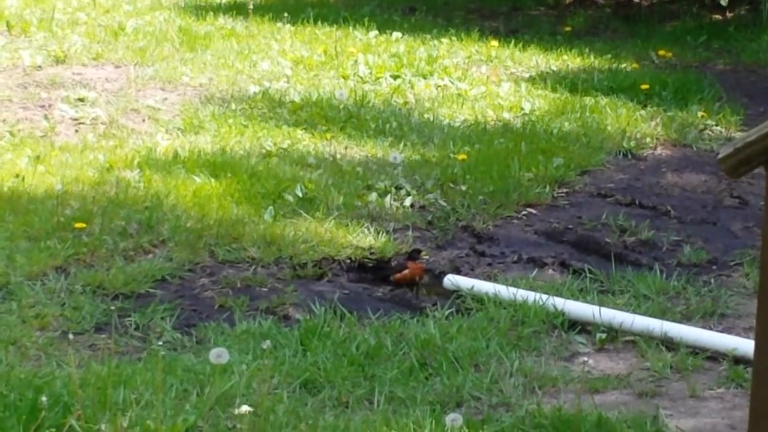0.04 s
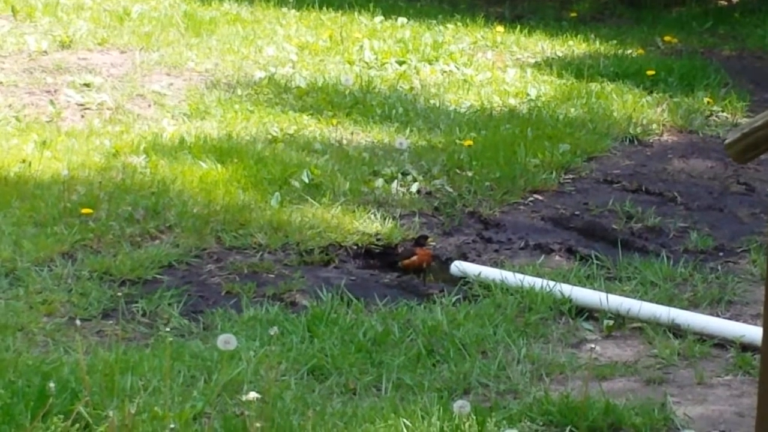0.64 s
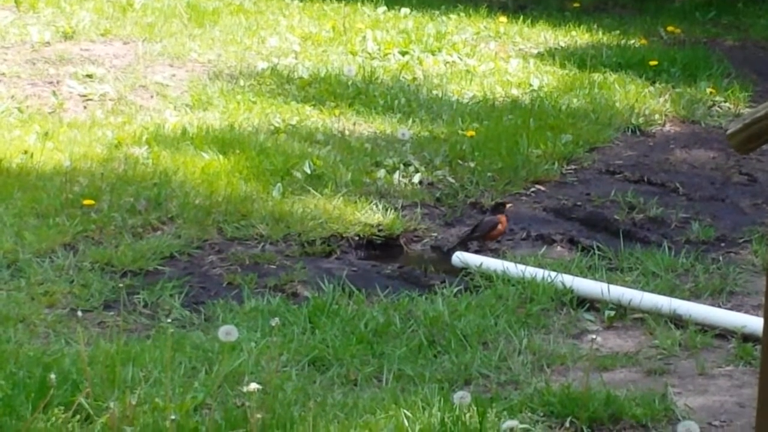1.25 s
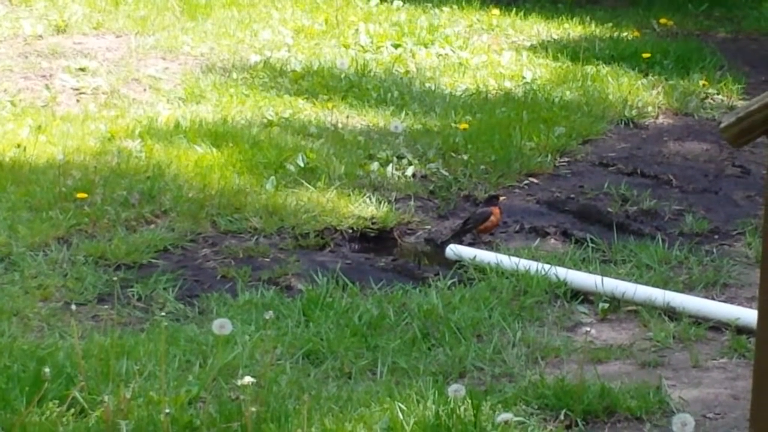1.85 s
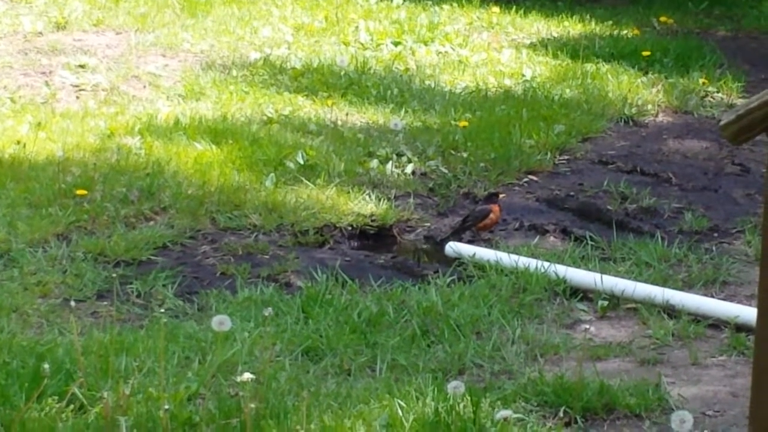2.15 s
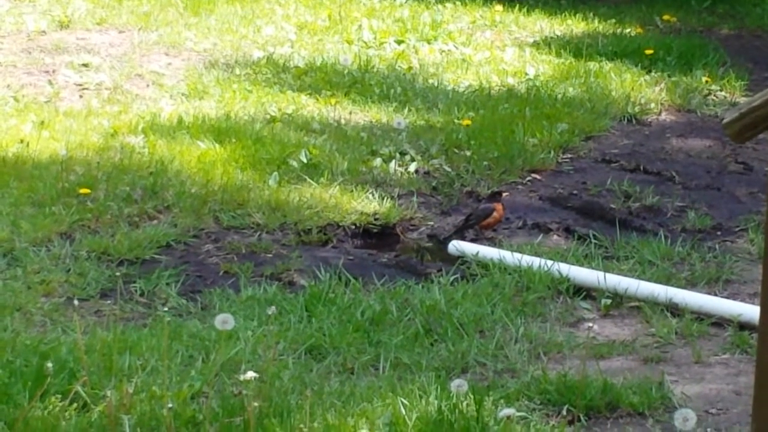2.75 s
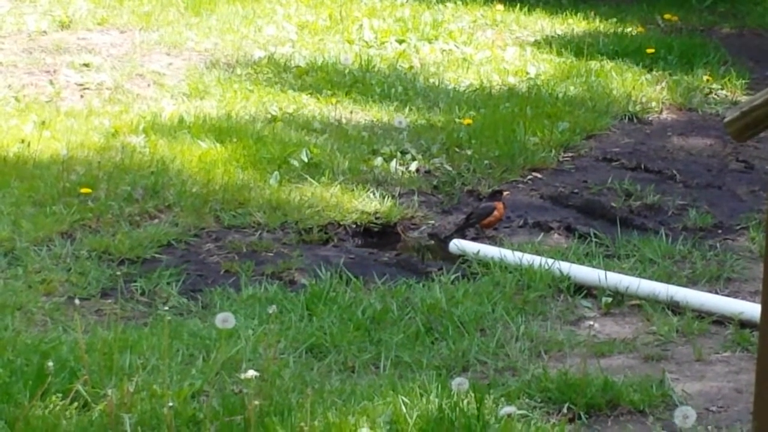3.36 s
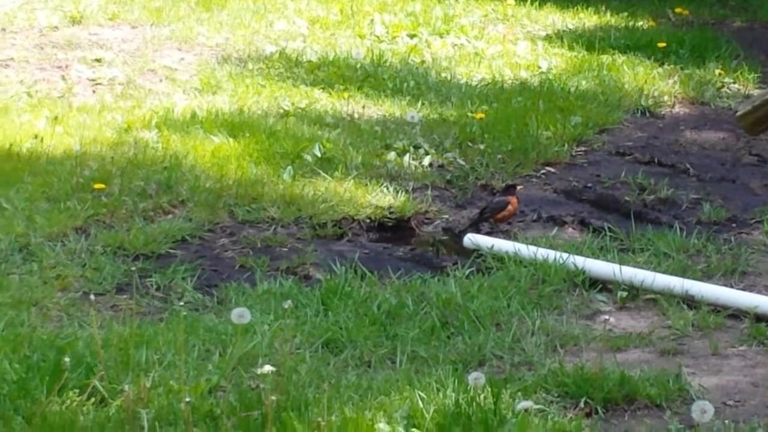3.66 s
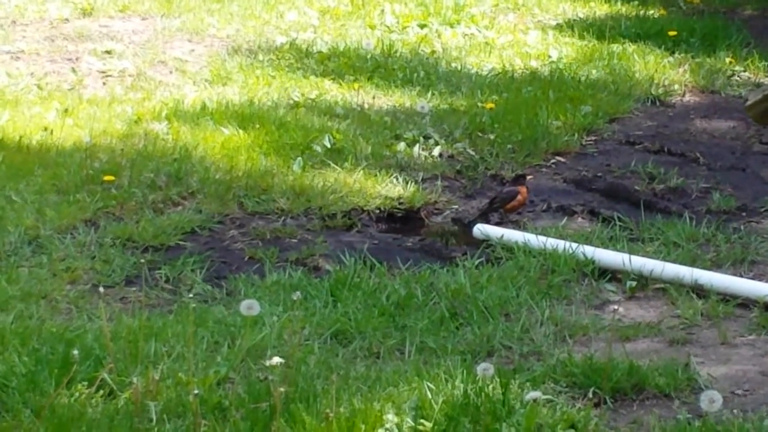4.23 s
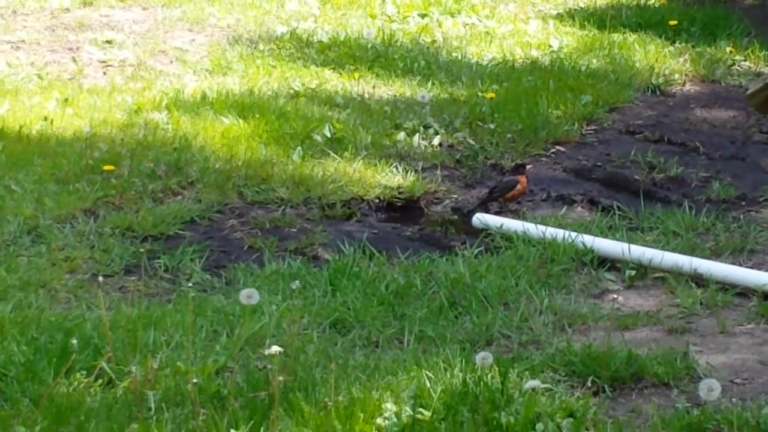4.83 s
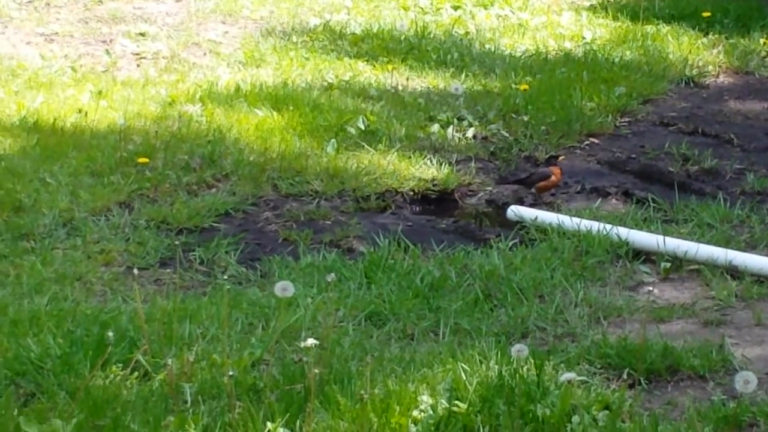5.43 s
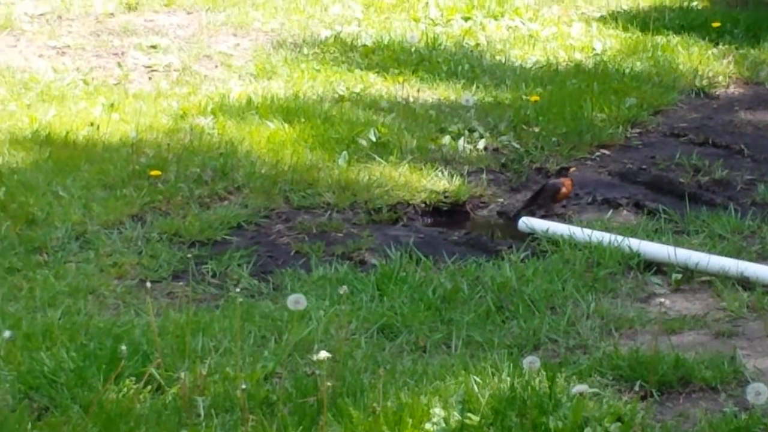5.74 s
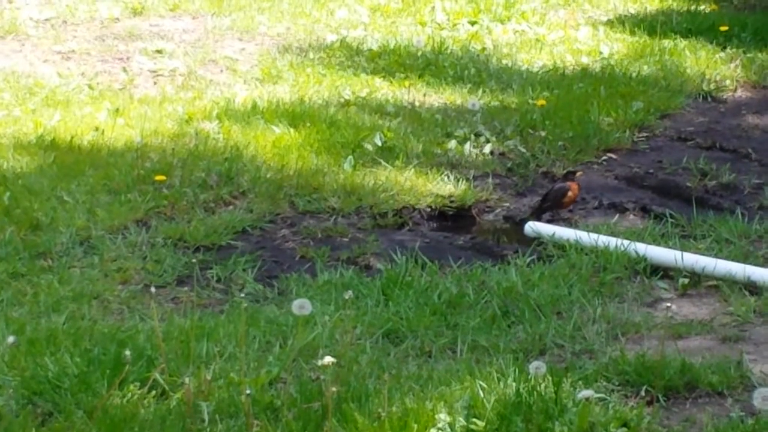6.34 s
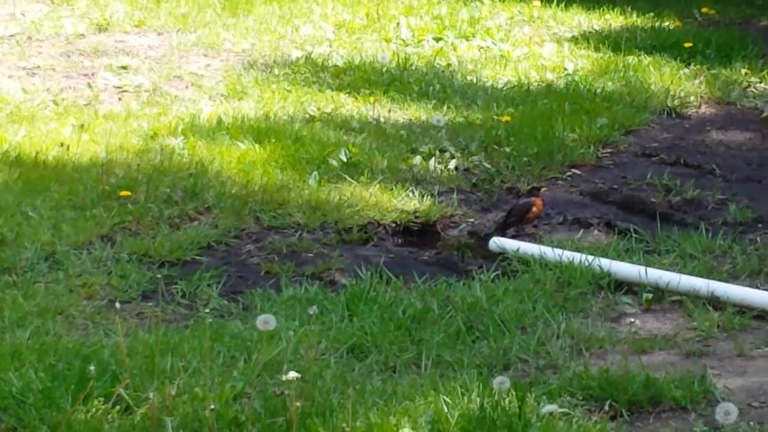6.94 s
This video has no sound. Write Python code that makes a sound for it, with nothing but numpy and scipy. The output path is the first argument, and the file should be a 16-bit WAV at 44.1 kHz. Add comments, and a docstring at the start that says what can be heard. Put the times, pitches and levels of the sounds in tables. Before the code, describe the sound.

Soft wind rustles and rumbles over a lawn throughout, with faint distant chirps in the first second. From about 1.1 seconds a songbird sings clear falling whistles, the main sound, each with an echoing tail. High sweeps come at 1.1, 1.8, 2.5 and 3.2 seconds, with lower, softer notes between them at 1.4, 2.2 and 2.9. A faint, thin trill runs behind until about 3 seconds. The song ends around 3.5 seconds. Quiet, raspy calls come from far off between 4 and 5.3 seconds and again from 6.5 to 7. From about 1.3 seconds to the end, a low hum swells and fades in short, uneven pulses. Close by, a very faint high whine, like a tiny motor, runs briefly at 1.2, 3.7 and 6.5 seconds. Slight scuffs like dry leaves come near 1.2, 2.1, 4.4, 4.8 and 5.8 seconds.

```python
"""A songbird beyond a lawn sings falling whistles, mostly in pairs; trees and house walls scatter them
into a long tail. Other birds chirp, trill and call far off, and soft wind rustles and rumbles. A low hum
near 96 Hz swells and fades as its pitch glides up or down through a resonance. Close by are brief
scuffs, like dry leaves, and three runs of a thin whine, like a tiny motor."""
import sys
import numpy as np
from scipy import signal
from scipy.fft import rfft, irfft, next_fast_len
from scipy.io import wavfile
from scipy.ndimage import uniform_filter1d

SR = 44100
rng = np.random.default_rng(int(sys.argv[2]) if len(sys.argv) > 2 else 0)


def materialize(psi):
    """Save the field psi as 16-bit PCM at rate SR to the path in sys.argv[1].

    A 1-D psi becomes a single channel; in a 2-D psi each row is a channel.
    """
    bounded = np.clip(np.atleast_2d(psi).T, -1, 1)
    quanta = np.round(bounded * 32767).astype(np.int16)
    wavfile.write(sys.argv[1], SR, quanta)


N = 317079
T = np.arange(N) / SR
FFT_SIZE = next_fast_len(N)
BIN_HZ = np.maximum(np.arange(FFT_SIZE // 2 + 1) * SR / FFT_SIZE, 1)


def undb(db):
    """Decibels to gain."""
    return 10 ** (np.asarray(db) / 20)


def curves(rows):
    """Table columns, interpolated linearly in time."""
    times_s, *columns = np.transpose(rows)
    return [np.interp(T, times_s, column) for column in columns]


def spectrum(points, hz):
    """(f/Hz, value) points, interpolated on a log-frequency axis."""
    points_hz, values = np.transpose(points)
    return np.interp(np.log(hz), np.log(points_hz), values)


def gate(start_s, end_s, edge_s):
    """Window with smooth edges centred on start and end."""
    ramp = np.minimum(T - start_s, end_s - T) / edge_s + .5
    return np.sin(np.pi / 2 * np.clip(ramp, 0, 1)) ** 2


def pan(db):
    """Stereo gains for a left-minus-right level."""
    return undb(np.array([[.5], [-.5]]) * db)


def walk(rate_hz):
    """Smooth random wander, spread near one."""
    knots = rng.standard_normal(4096)
    wander = np.interp(T * rate_hz, np.arange(len(knots)), knots)
    return uniform_filter1d(wander, max(int(SR / rate_hz / 2), 1)) * np.sqrt(2)


def tone(hz, lead_s=0):
    """Unit-rms sine along a pitch curve."""
    return np.sqrt(2) * np.sin(2 * np.pi * (np.cumsum(hz) / SR + hz * lead_s))


def scatter(x, t60_s, onset_s):
    """Dense unit-energy echoes from trunks, leaves and walls, different at each ear."""
    t = T[:2 * SR]
    echoes = rng.standard_normal((2, len(t))) * undb(-60 * t / t60_s) * (1 - np.exp(-t / onset_s))
    echoes /= np.sqrt(np.sum(echoes ** 2, axis=1, keepdims=True))
    return signal.fftconvolve(x[None], echoes, axes=1)[:, :N]


# Wind, left-right likeness: f/Hz, correlation
AIR_CORRELATION = [(60, 1), (130, 0.94), (290, 0.87), (620, 0.43), (950, 0.037), (1400, -0.34),
                   (2200, 0.089), (3500, 0.0024), (6000, -0.012)]
# Wind, balance: f/Hz, left minus right/dB
AIR_PAN = [(60, -5.5), (110, 3.5), (200, -2), (370, 1.5), (680, 0), (1250, 0.5), (2300, -1), (4210, -0.5),
           (7740, -3), (14200, 0)]
def air(colour):
    """Unit-rms stereo air noise: alike in the bass, unrelated in the treble."""
    mid, side = rfft(rng.standard_normal((2, FFT_SIZE)))
    alike = np.clip(spectrum(AIR_CORRELATION, BIN_HZ), -.99, .99)
    stereo = mid * np.sqrt(1 + alike) + side * np.sqrt(1 - alike) * np.array([[1], [-1]])
    shaped = stereo * undb(spectrum(colour, BIN_HZ)) * pan(spectrum(AIR_PAN, BIN_HZ))
    noise = irfft(shaped, FFT_SIZE)[:, :N]
    return noise / noise.std()


# Breeze strength: t/s, relative rush level/dB, relative hiss level/dB
BREEZE = [(0.16, -64.5, -72.5), (0.59, -64.5, -72.5), (0.66, -65, -72), (1.07, -65, -72),
          (1.32, -60.5, -67), (1.75, -62, -69), (2.35, -58.5, -66), (2.45, -61, -67.5), (2.97, -59, -66.5),
          (3.24, -62.5, -69.5), (3.77, -58.5, -67.5), (3.84, -63, -71.5), (4.35, -62.5, -70),
          (4.43, -61, -66), (4.44, -63, -71), (4.48, -64, -70.5), (4.73, -60, -69), (4.93, -58.5, -68),
          (5.49, -62, -71), (6.0, -58.5, -68), (6.07, -62, -71.5), (6.63, -64, -71.5), (6.87, -59.5, -69),
          (7.12, -60.5, -68)]
# Spectra of the three wind bands: f/Hz, relative density/dB
RUMBLE_COLOUR = [(20, -21), (42, -4.5), (70, 5.5), (115, 3.5), (143, 0.5), (168, -2), (210, -1), (262, -11),
                 (302, -8.5), (335, -35.5), (370, -6.5), (410, -32.5), (600, -34.5)]
RUSH_COLOUR = [(150, -13), (300, 6), (380, 0), (550, 1), (750, 0.5), (950, 3.5), (1300, -2.5), (1700, -3.5),
               (2300, -10.5), (3500, -18), (6000, -43)]
HISS_COLOUR = [(1000, -9), (2500, -1), (4500, -1), (7000, -0.5), (9500, -2), (12000, -3.5), (15000, -6.5)]
def wind():
    """Low buffets, the rush of far trees and a fine hiss, all swelling with the breeze."""
    rush_db, hiss_db = curves(BREEZE)
    rumble = undb(buffeting_db() + 9.5 + walk(17)) * air(RUMBLE_COLOUR)
    rush = undb(rush_db + 4 + .75 * walk(11)) * air(RUSH_COLOUR)
    hiss = undb(hiss_db + 7 + .8 * walk(25)) * air(HISS_COLOUR)
    return rumble + rush + hiss


def buffeting_db(calm_db=-65.5, growth=1.1):
    """Low turbulence grows faster than the rush."""
    rush_db, _ = curves(BREEZE)
    return calm_db + growth * (rush_db - calm_db)


HUM_HZ, HUM_WIDTH_HZ = 95.95, 8.5
def resonance(hz):
    """Gain of the hum's resonance, one at its centre."""
    return 1 / (1 + (2 * (hz - HUM_HZ) / HUM_WIDTH_HZ) ** 2)


# Resonance crossings: t/s, glide/(Hz/s), level/dB
HUM_SWELLS = [(1.329, 43.5, -34.5), (1.542, -70, -43), (1.93, 27.5, -52.5), (2.152, 60, -33.5),
              (2.354, -120, -44), (2.594, -67, -37.5), (2.891, 70, -46.5), (3.46, 43, -49),
              (3.703, 54.5, -33.5), (3.966, -74, -41.5), (4.381, 33, -46.5), (4.634, 55.5, -35),
              (5.01, 71, -45), (5.323, -55, -39.5), (5.649, 80, -34.5), (6.262, -73, -38.5),
              (6.951, 20.5, -33)]
# Higher, arching moans: start/s, end/s, top f/Hz, level/dB
HUM_MOANS = [(2.15, 2.431, 114, -50), (4.701, 5.105, 129.2, -49), (5.694, 5.932, 131.3, -47)]
def hum(reach_hz=6, arch=.12, upper_ratio=1.63, upper_db=-4.5, right_lead_s=.00032):
    """A low tone swells and fades as it glides through a resonance; at times it moans higher."""
    out = np.zeros(N)
    for at_s, glide_hz_per_s, db in HUM_SWELLS:
        hz = HUM_HZ + np.clip(glide_hz_per_s * (T - at_s), -2 * reach_hz, 2 * reach_hz)
        half_s = reach_hz / abs(glide_hz_per_s)
        out += undb(db) * resonance(hz) * gate(at_s - half_s, at_s + half_s, edge_s=half_s) * tone(hz)
    for start_s, end_s, top_hz, db in HUM_MOANS:
        position = np.clip(2 * (T - start_s) / (end_s - start_s) - 1, -1, 1)
        hz = top_hz * (1 - arch * position ** 2 + .0696 * walk(70))
        moan = tone(hz) + undb(upper_db) * tone(upper_ratio * hz)
        out += undb(db) * gate(start_s, end_s, edge_s=(end_s - start_s) / 2) * moan
    stir = irfft(rfft(rng.standard_normal(FFT_SIZE)) * resonance(BIN_HZ), FFT_SIZE)[:N]
    out += undb(buffeting_db() + 5) * stir / stir.std()  # faint ringing between swells
    return np.array([out, np.interp(T + right_lead_s, T, out)]) * pan(1.7)


# Far chirps: t/s, length/s, start f/Hz, end f/Hz, relative level/dB
FAR_CHIRPS = [(0.087, .12, 2400, 2390, -76), (0.248, 0.086, 3250, 2780, -66.5),
              (0.295, 0.013, 4670, 3630, -66), (0.511, 0.048, 2830, 2920, -67),
              (0.612, 0.052, 2310, 2240, -70), (.80, 0.049, 2800, 2870, -66),
              (0.909, 0.056, 2220, 2290, -71.5), (0.946, .09, 3570, 3500, -77),
              (3.32, .12, 7340, 7240, -71), (3.639, 0.081, 4760, 4700, -69.5)]
def chirps(warble=.045, gain_db=-4.5):
    """Short warbled glides of other birds."""
    out, wobble = np.zeros(N), 1 + warble * walk(140)
    for start_s, length_s, start_hz, end_hz, db in FAR_CHIRPS:
        hz = wobble * np.interp(T, [start_s, start_s + length_s], [start_hz, end_hz])
        out += undb(db + gain_db) * gate(start_s, start_s + length_s, edge_s=.014) * tone(hz)
    return out


def from_afar(calls):
    """Distant calls arrive wholly as echo."""
    return undb(3) * (scatter(calls, t60_s=.092, onset_s=.002) + scatter(calls, t60_s=.89, onset_s=.011))


SHELF_HZ = 2398
# Long whistles: t/s, opening/s, fall/s, opening f/Hz, bend f/Hz, end f/Hz, relative level/dB
LONG_WHISTLES = [(1.076, .003, 0.18, 3203, 3180, 1950, -49), (1.75, 0.12, .19, 3610, 3230, 1885, -43.5),
                 (2.494, 0.14, 0.13, 3716, 3025, 1860, -41.5), (3.225, .129, .135, 3590, 2980, 1852, -43)]
def long_whistles(flick_hz=601.7, flick_s=.008, drop_hz_per_s=14500, soft_db=12.5, swell_s=.093,
                  catch_hz=3180, catch_width_hz=55):
    """Swelling notes: a flick from above, a sagging opening, a quick drop to a sinking shelf."""
    for start_s, opening_s, fall_s, opening_hz, bend_hz, end_hz, db in LONG_WHISTLES:
        age_s = np.maximum(T - start_s, 0)
        opened = np.minimum(age_s / opening_s, 1)
        falling_s = np.clip(age_s - opening_s, 0, fall_s)
        drop_hz = bend_hz - SHELF_HZ
        hz = opening_hz + (bend_hz - opening_hz) * opened
        hz += flick_hz * np.exp(-age_s / flick_s) * (1 - opened)
        hz -= drop_hz * (1 - np.exp(-(falling_s * drop_hz_per_s / drop_hz) ** 2))
        hz += (end_hz - SHELF_HZ) * falling_s / fall_s
        catch_db = 13 * np.exp(-((hz - catch_hz) / catch_width_hz) ** 2)  # the voice thins at one pitch
        level_db = db - soft_db * np.exp(-age_s / swell_s) - catch_db
        yield start_s, start_s + opening_s + fall_s, hz, level_db


# Low answering whistles: t/s, length/s, end f/Hz, relative level/dB
LOW_WHISTLES = [(1.397, 0.2, 1585, -49.5), (2.166, 0.21, 1540, -47), (2.883, 0.16, 1540, -47.6)]
def low_whistles(start_hz=1952, ease=.68, accent_db=6.5, accent_s=.024, fade_db_per_s=25):
    """Accented notes that fade as their fall eases off."""
    for start_s, length_s, end_hz, db in LOW_WHISTLES:
        age_s = np.clip(T - start_s, 0, length_s)
        hz = start_hz + (end_hz - start_hz) * (age_s / length_s) ** ease
        level_db = db + accent_db * np.exp(-age_s / accent_s) - fade_db_per_s * age_s
        yield start_s, start_s + length_s, hz, level_db


def phrase():
    """Pitch and amplitude of one voice through all its whistles."""
    hz, amp = np.full(N, float(SHELF_HZ)), np.zeros(N)
    for start_s, end_s, note_hz, db in [*long_whistles(), *low_whistles()]:
        window = gate(start_s, end_s, edge_s=.013)
        hz = np.where(window > 0, note_hz, hz)
        amp += window * undb(db)
    return hz, amp


# Direct path, coloured by the bounce off the lawn: f/Hz, left gain/dB, right gain/dB
LAWN_BOUNCE = [(1600, -4, -5), (2100, -1, -5), (2500, -4, -3), (2750, -4, 1), (2940, -1, 8), (3100, -7, -6),
               (3350, -7, 1), (4200, -5, -4)]
def songbird(waver=.0048, hoarse=.0204, hoarse_hz=3330, wall_s=.048):
    """Falling whistles, hoarse at the top; echoes of the higher pitch beat against the direct tone."""
    hz, amp = phrase()
    left, right = (undb(spectrum([(row[0], row[ear]) for row in LAWN_BOUNCE], hz)) for ear in (1, 2))
    opening = np.clip((hz - hoarse_hz) / 300 + .5, 0, 1)
    hz = hz * (1 + waver * walk(120) + hoarse * opening * walk(450))
    song = amp * tone(hz)
    direct = np.array([left * song, right * amp * tone(hz, lead_s=.00009)])
    reflected = song * (hz / 3500) ** 2  # the wall returns high pitch best
    wall = np.array([np.interp(T - wall_s - lag_s, T, reflected) for lag_s in (0, .0002)])
    near = scatter(song, t60_s=.14, onset_s=.004)
    far = scatter(song * (hz / 2600) ** .92, t60_s=1.07, onset_s=.015)
    return undb(-1) * direct + undb(-11) * wall + undb(-4) * near + undb(-2) * far


# Motor runs: start/s, end/s, top f/Hz, relative level/dB
MOTOR_RUNS = [(1.154, 1.72, 11070, -71), (3.71, 4.372, 13260, -66), (6.546, 7.16, 12200, -72)]
def motor_whine(rest_hz=7930, up_hz_per_s=41000, down_hz_per_s=23500, resonance_hz=10300,
                half_width_hz=490, waver=.007, hunt=.0097):
    """A tiny motor runs up through a resonance, holds and runs down; close reflections make it flicker."""
    hz, amp = np.full(N, float(rest_hz)), np.zeros(N)
    for start_s, end_s, top_hz, db in MOTOR_RUNS:
        ramp_hz = np.minimum(up_hz_per_s * (T - start_s), down_hz_per_s * (end_s - T))
        hz += np.clip(ramp_hz, 0, top_hz - rest_hz)
        amp += undb(db) * gate(start_s, end_s, edge_s=.03)
    amp *= undb(3.9 * walk(60)) / np.hypot(1, (hz - resonance_hz) / half_width_hz)
    hz *= 1 + waver * walk(300) + hunt * walk(12)
    direct = amp * np.array([tone(hz), tone(hz, lead_s=.00003)])
    reflections = undb(-2) * scatter(direct[0], t60_s=.032, onset_s=.00069)
    return (direct + reflections) * pan(-2.9)


# Dry scuffs: t/s, length/s, centre f/Hz, level/dB
SCUFFS = [(1.23, 0.12, 6360, -70), (2.116, 0.21, 6700, -70), (4.381, 0.055, 7440, -61),
          (4.418, 0.043, 990, -60), (4.83, 0.027, 1500, -59), (5.69, 0.2, 2700, -66),
          (5.915, 0.14, 2000, -67), (5.98, .03, 7200, -70)]
# Scuff spectrum: ratio to centre frequency, relative density/dB
SCUFF_COLOUR = [(.25, -16.5), (.7, -6), (1, 10), (1.25, 4), (1.55, -9), (2.1, -4), (4, -19)]
def rustles(grain_db=2):
    """Brief grainy noise, like dry leaves stirring."""
    out, noise = np.zeros((2, N)), rfft(rng.standard_normal((2, FFT_SIZE)))
    for start_s, length_s, centre_hz, db in SCUFFS:
        scuff = irfft(noise * undb(spectrum(SCUFF_COLOUR, BIN_HZ / centre_hz)), FFT_SIZE)[:, :N]
        out += undb(db) * gate(start_s, start_s + length_s, edge_s=length_s / 2) * scuff / scuff.std()
    return out * undb(grain_db * walk(250)) * pan(-4.3)


# Trill contour: t/s, f/Hz, level/dB
FAR_TRILL = [(1.38, 5870, -83), (2.02, 5520, -73), (2.13, 5490, -68), (2.62, 5410, -71), (2.78, 5480, -67),
             (3.12, 5353, -77)]
def trill(pulse_hz=30, depth=.67, waver=.0092, fading_db=2):
    """A far bird's thin, pulsing whistle, slowly sinking."""
    hz, db = curves(FAR_TRILL)
    amp = undb(db + fading_db * walk(12)) * gate(FAR_TRILL[0][0], FAR_TRILL[-1][0], edge_s=.03)
    pulses = 1 + depth * np.sin(2 * np.pi * pulse_hz * T)
    whistle = amp * pulses * tone(hz * (1 + waver * walk(300)))
    return scatter(whistle, t60_s=.11, onset_s=.00079) * pan(-5.2)


# Nasal calls: t/s, relative level/dB
NASAL_CALLS = [(4.0, -63), (4.41, -63), (4.615, -59.5), (4.82, -65), (5.035, -59), (5.255, -62),
               (6.53, -64.5), (6.74, -60), (6.945, -64.5)]
# Their overtones: harmonic number, gain/dB
NASAL_HARMONICS = [(2, 0.5), (3, -7.5), (4, -10)]
def nasal_calls(pitch_hz=875, rasp=.1):
    """A bird's short raspy calls: harmonics of a jittering pitch, with no fundamental."""
    hz = pitch_hz * (1 + rasp * walk(500))
    amp = sum(undb(db) * gate(at_s, at_s + .015, edge_s=.041) for at_s, db in NASAL_CALLS)
    return amp * sum(undb(db) * tone(harmonic * hz) for harmonic, db in NASAL_HARMONICS)


def scene():
    """Birds and wind over the lawn, with small noises close by."""
    birds = songbird() + from_afar(chirps() + nasal_calls()) + trill()
    return birds + wind() + hum() + motor_whine() + rustles()


def record(dry):
    """Steep elliptic low-pass."""
    cutoff_hz = 14550
    return signal.sosfilt(signal.ellip(12, .1, 80, cutoff_hz, fs=SR, output="sos"), dry)


dry = scene()
out = record(dry)
materialize(out)
```